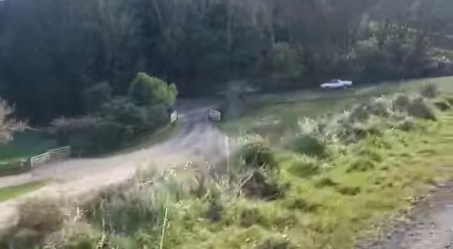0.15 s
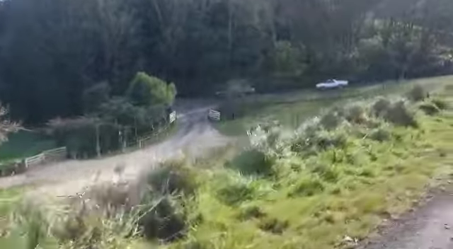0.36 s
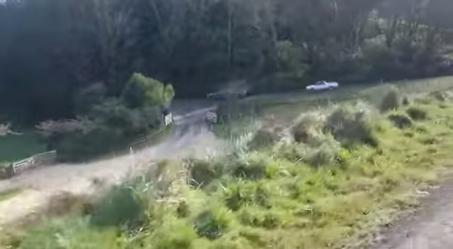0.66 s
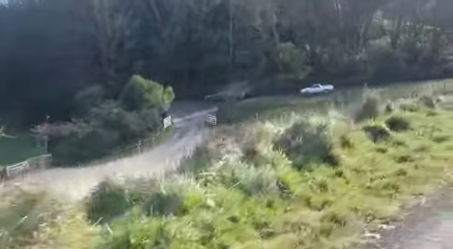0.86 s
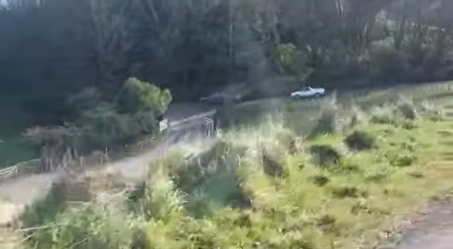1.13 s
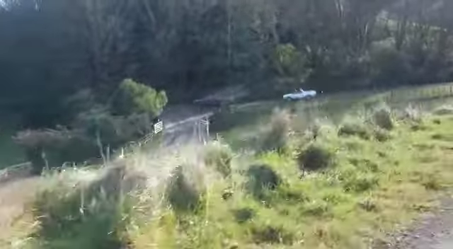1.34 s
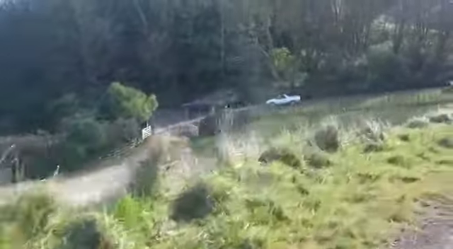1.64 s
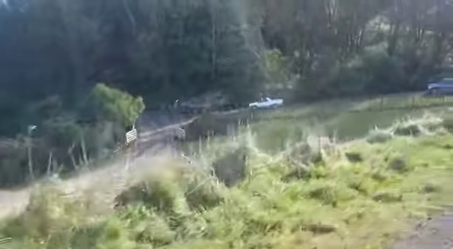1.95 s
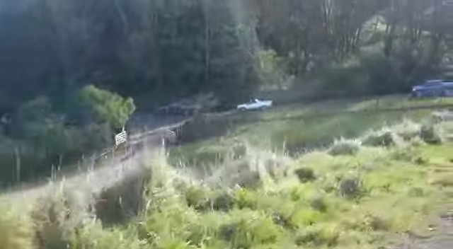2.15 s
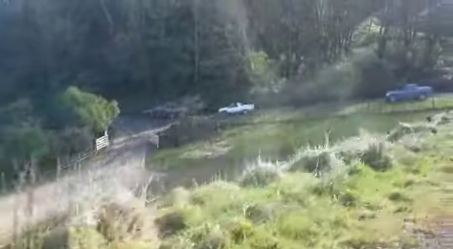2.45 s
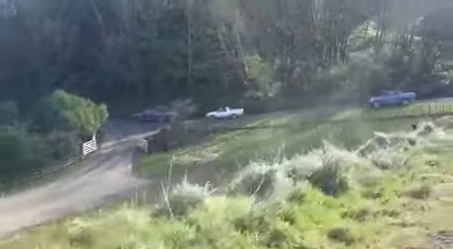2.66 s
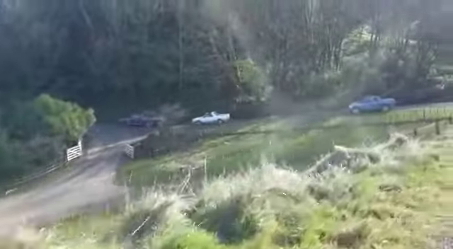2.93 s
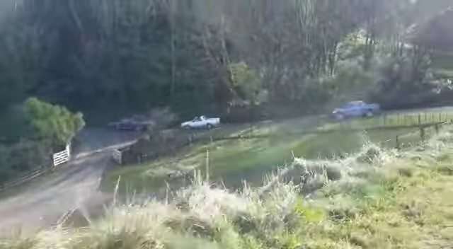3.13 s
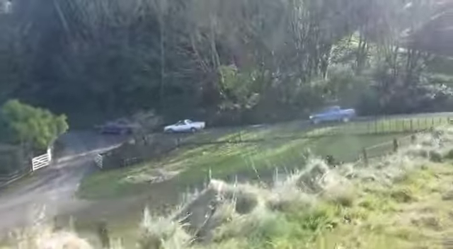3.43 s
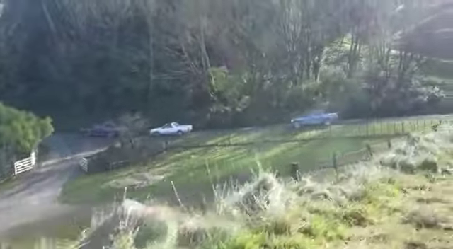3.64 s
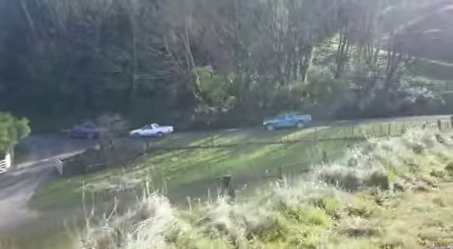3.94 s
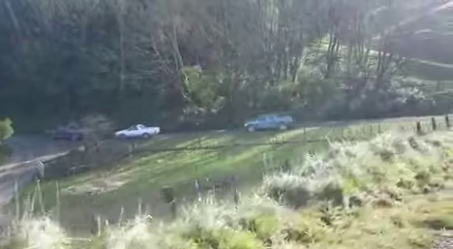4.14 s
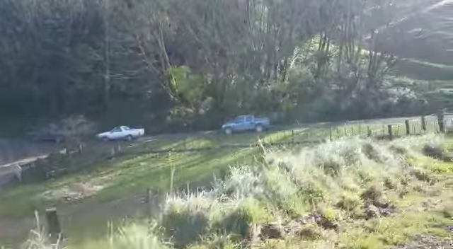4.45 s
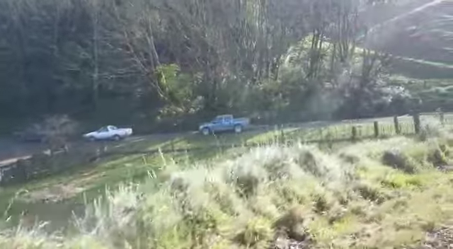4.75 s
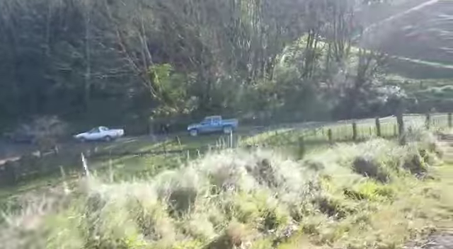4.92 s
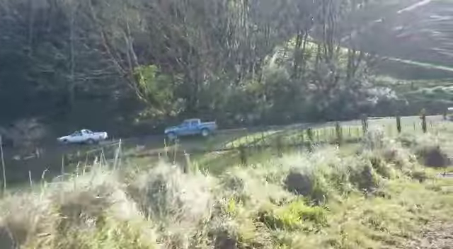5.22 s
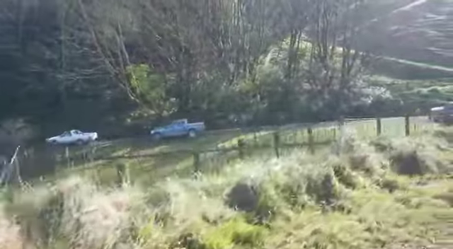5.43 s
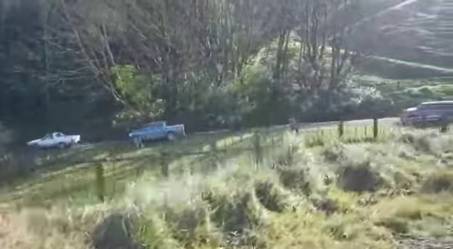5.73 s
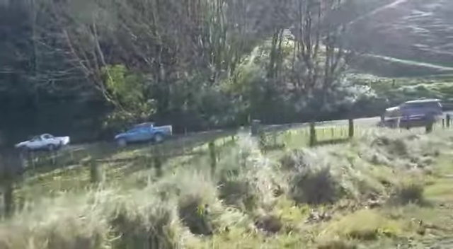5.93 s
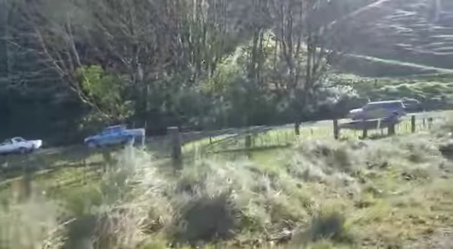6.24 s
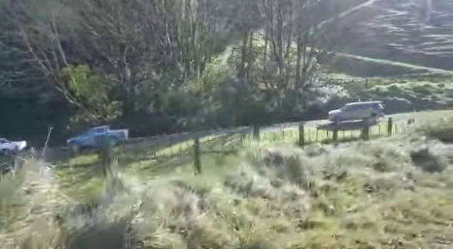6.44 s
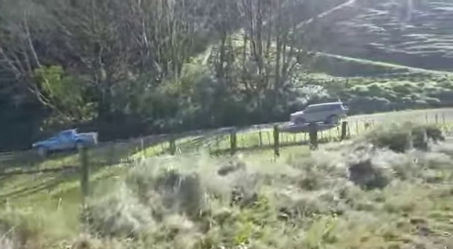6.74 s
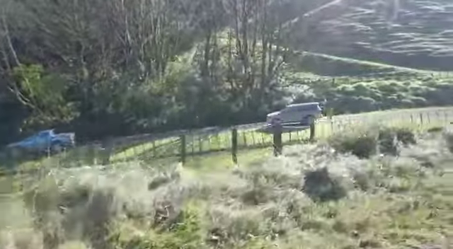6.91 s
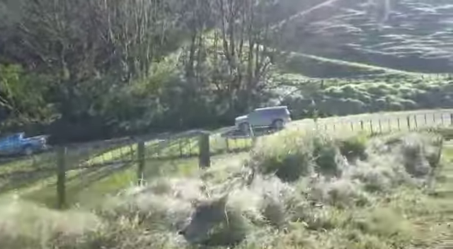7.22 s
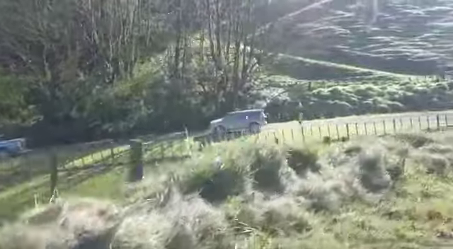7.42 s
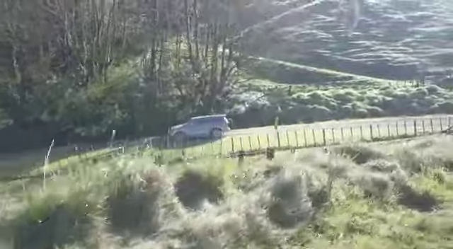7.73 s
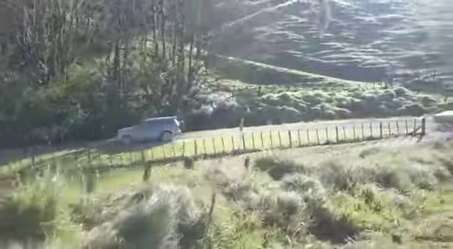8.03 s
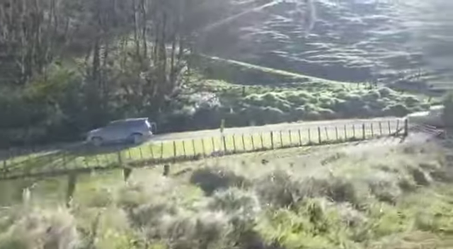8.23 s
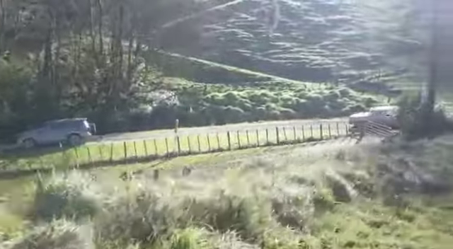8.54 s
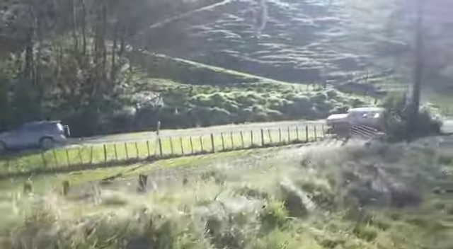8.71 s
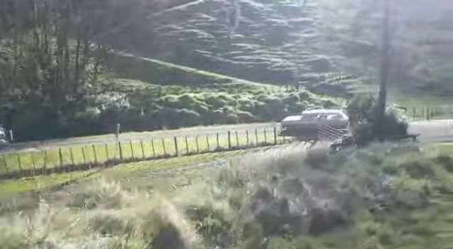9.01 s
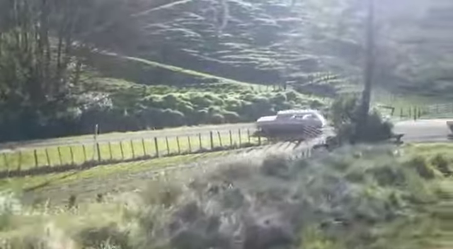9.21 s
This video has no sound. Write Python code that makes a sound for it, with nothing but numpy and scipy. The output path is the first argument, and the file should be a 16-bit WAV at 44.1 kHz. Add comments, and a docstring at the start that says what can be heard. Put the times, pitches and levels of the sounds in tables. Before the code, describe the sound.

A close on-board microphone catches a loud, low, pulsing exhaust, its beats galloping, limping and stumbling, with hissing gas and chattering thin metal on every firing. Chassis rumble and gravelly tyre noise run throughout. Small ticks knock mostly in the first half, then a fluctuating intake rasp and drone enter and the turning quickens. No echoes; the engine keeps running to the end.

```python
"""A farm track, heard while riding on a vehicle whose small engine misfires into a broken exhaust.
It limps in rounds of eight turns: firings boom in the silencer and shake its loose metal, unfired turns only puff.
A little before halfway the intake begins to rasp; past halfway the engine turns faster.
Noise shaped into rumble, roar and crunch makes the ride; short bursts make the knocks, and thin hisses flare up."""
import sys
import numpy as np
from scipy import signal
from scipy.fft import rfft, irfft, next_fast_len
from scipy.io import wavfile
from scipy.ndimage import map_coordinates

SR = 44100
rng = np.random.default_rng(int(sys.argv[2]) if len(sys.argv) > 2 else 0)


def persist_wave(psi):
    """Save psi, clipped to +-1, as 16-bit WAV."""
    counts = np.round(np.clip(psi, -1, 1) * 32767).astype(np.int16)
    wavfile.write(sys.argv[1], SR, np.atleast_2d(counts).T)


N = 413216
TOP_HZ = 15720  # nothing sounds above this pitch

# the tinny colour of thin loose metal, as a spectrum: pitch_hz [Hz], level_db [dB, relative]
TIN_COLOUR = [(300, -38), (900, 2), (1900, -0.5), (3000, 1), (3700, 0), (5200, -0.5), (7400, -6),
              (8600, -25.5), (12000, -38), (15500, -30.5)]


def amp(db):
    """Turn decibels into a gain."""
    return 10 ** (np.asarray(db) / 20)


def unit(x):
    """Scale to an average (rms) level of 1."""
    return x / np.sqrt(np.mean(x ** 2) + 1e-20)


def curves(rows):
    """Draw straight lines between timed rows: one value per sample for each column after the time."""
    start_s, *columns = np.transpose(rows)
    time_s = np.arange(N) / SR
    return [np.interp(time_s, start_s, column) for column in columns]


def wobble(rate):
    """A smooth random curve through `rate` random points a second."""
    points = rng.standard_normal(int(N * rate / SR) + 4)
    return map_coordinates(points, [np.arange(N) * rate / SR])


def filtered(x, response):
    """Change the strength and phase of each pitch in x by a response given as a function of Hz."""
    size = next_fast_len(N + SR // 2)
    pitch_hz = np.fft.rfftfreq(size, 1 / SR)
    return irfft(rfft(x, size) * response(pitch_hz), size)[:N]


def coloured(x, points):
    """Shape x by a spectrum of (Hz, dB) points, keeping the power of white noise."""
    point_hz, point_db = np.transpose(points)

    def response(hz):
        return unit(amp(np.interp(np.log(hz + 1), np.log(point_hz), point_db)))

    return filtered(x, response)


def resonate(x, modes):
    """Ring x through resonances of (Hz, width in Hz, dB), added with alternating sign."""
    def response(f):
        total = 0
        for k, (centre, width, db) in enumerate(modes):
            peak = 1j * f * width / (centre * centre - f * f + 1j * f * width)
            total = total + (-1) ** k * amp(db) * peak
        return total

    return filtered(x, response)


def muffled(x, hz):
    """Remove the treble above hz with a steep low-pass."""
    return signal.sosfilt(signal.butter(4, hz, fs=SR, output="sos"), x)


def impulses(times, sizes):
    """Place one single-sample spike at each time."""
    places = np.maximum(np.round(times * SR), 0).astype(int)
    return np.bincount(places, sizes, N)[:N]


def add(layer, s, sound):
    """Mix a sound into the layer at time s."""
    room = layer[max(round(s * SR), 0):][:len(sound)]
    room += sound[:len(room)]


def crank(kick_s=0.0004, jitter_s=0.0004):
    """Time the turns of the crank: firings as rows (s, boom dB, rattle dB), and the times of unfired turns."""
    # progress, about 38 turns a second at first and 44 later: time_s [s], turns completed [count]
    crank_progress = [(0.003, 0), (0.955, 36), (2.622, 100), (2.862, 109), (3.272, 125), (4.322, 165),
                      (4.524, 173), (5.554, 213), (5.745, 221), (5.922, 229), (7.177, 285), (8.259, 333),
                      (9.373, 382)]
    # gait name: the turns of an eight-turn round that fire [numbered from 0]
    firing_gaits = {"trot": (0, 2, 5), "gallop": (0, 2, 3, 5), "limp": (2, 3, 5), "stumble": (2, 4, 5),
                    "roll": (2, 3, 4, 5)}
    # spells of running: start_s [s], gaits repeated in this order, one a round [names]
    running_spells = [(0.06, "gallop gallop roll limp"), (0.9, "roll limp gallop"), (2.81, "roll"),
                      (3.22, "stumble stumble gallop"), (3.85, "trot"), (4.47, "stumble roll roll stumble"),
                      (5.7, "trot"), (8.53, "trot trot gallop gallop gallop")]
    # strength of a firing on each turn of the round: boom_db [dB, relative], rattle_db [dB, relative]
    round_levels = [(-16, -57.5), (-17, -60), (-16.5, -56.5), (-16, -56), (-16, -56.5), (-16, -57),
                    (-18, -60.5), (-16.5, -58.5)]
    # how hard the engine sounds along the ride: time_s [s], boom_db [dB, added], rattle_db [dB, added]
    vigour_levels = [(0, -0.5, -1), (1, 0.5, 0), (2.5, 0.5, 0), (3.4, -1, 0.5), (4.3, 1, -2),
                     (5.1, -.5, -2.5), (5.8, -.5, 0), (6.6, 0.5, 1), (7.4, 1, 0.5), (8.1, 0, 1),
                     (8.9, -1, 0.5), (9.37, -0.5, -1.5)]
    # strays outside the gait and weak or hard burns: time_s [s], boom_db [dB, added], rattle_db [dB, added]
    odd_firings = [(0.0, -7.5, -7.5), (0.27, 0, 5.5), (0.8, -8, -4.5), (1.08, -4.5, -13), (2.33, 0.5, -2.5),
                   (2.41, -5.5, -7.5), (2.54, 1.5, 1.5), (3.02, 1, -9), (3.38, 1, -1), (3.4, 0.5, 1),
                   (3.43, -4, -4.5), (3.48, 2.5, -10.5), (3.53, -1, -8.5), (3.56, 0.5, -8.5), (3.9, 1, -7),
                   (4.03, 0.5, 5.5), (4.24, -5, -2), (4.27, 0.5, 4), (4.37, -0.5, -3.5), (4.45, 0, 2.5),
                   (4.6, -3, -5), (5.3, 0, -4.5), (5.81, -7, -11), (5.99, -5.5, -5), (6.21, -1, -1.5),
                   (6.24, -0.5, 1.5), (6.35, -19, -11.5), (6.42, 2, 2.5), (6.53, -3, -2),
                   (7.56, -3.5, -14.5), (7.78, -3.5, -4), (7.85, 0.5, 2.5), (7.96, -3.5, -5.5),
                   (8.35, -1, 3.5), (8.44, -15, -14.5), (8.69, -3, 6.5), (8.83, -16, -13), (8.9, 1.5, 8),
                   (9.19, -21, -17)]

    time_s, count = np.transpose(crank_progress)
    turns = np.interp(np.arange(count[-1]), count, time_s)

    def nearest(time):
        return np.argmin(np.abs(turns - time))

    fires = np.zeros(len(turns), bool)
    place = np.zeros(len(turns), int)  # position of each turn within its round
    extra_db = np.zeros((2, len(turns)))
    for start_s, names in running_spells:
        first = nearest(start_s)
        left = len(turns) - first
        spell = [k in firing_gaits[name] for name in names.split() for k in range(len(round_levels))]
        fires[first:] = np.resize(spell, left)  # repeats until a later spell replaces it
        place[first:] = np.arange(left) % len(round_levels)
    for time, *db in odd_firings:
        fires[nearest(time)] = True
        extra_db[:, nearest(time)] = db

    # three firings in a row kick the flywheel a little ahead; every turn is also slightly uneven
    third_in_row = fires & np.roll(fires, 1) & np.roll(fires, 2)
    times = turns - kick_s * third_in_row + jitter_s * rng.standard_normal(len(turns))
    knots, *vigour = np.transpose(vigour_levels)
    vigour_db = [np.interp(turns, knots, db) for db in vigour]
    boom_db, rattle_db = np.array(round_levels)[place].T + extra_db + vigour_db
    return np.column_stack([times, boom_db, rattle_db])[fires], turns[~fires]


def exhaust(fired, missed, boom_db=53.0, puff_db=-32, scatter_db=0.74, pipe_top_hz=1200):
    """Each pressure pulse rings the silencer and, weakly, the pipe; churning gas adds a steady murmur."""
    # ringing of the pipe: centre_hz [Hz], width_hz [Hz], level_db [dB, relative]
    pipe_modes = [(227, 8.4, -25.5), (321, 30, -34.5), (352.1, 13, -25), (548, 24, -41)]
    # the whole silencer box: centre_hz [Hz], width_hz [Hz], level_db [dB, relative]
    box_modes = [(53.6, 8.3, 0), (68.6, 16.3, -.5)]
    # its chambers, before heat shifts them: centre_hz [Hz], width_hz [Hz], level_db [dB, relative]
    chamber_modes = [(176.9, 24.9, -2.2), (196, 17.4, -4.9)]
    # the frame rocking on its mounts: centre_hz [Hz], width_hz [Hz], level_db [dB, relative]
    frame_modes = [(36, 10, -15.5)]
    # changing level of the box's deep ring: time_s [s], level_db [dB, relative]
    deep_levels = [(0, 0.5), (5.2, 0.96), (5.8, 0.5), (8, -1), (9.37, 2)]
    flow_db, cooling_s = -39, .04
    cool_pitch, hot_pitch = .985, 1.04  # factors on both chambers' pitch

    times = fired[:, 0]
    # no two burns are alike: each shares its push differently between box and chambers
    scatter = scatter_db * rng.standard_normal((len(fired), 2)).T
    deep, upper = amp(fired[:, 1] + scatter)
    puffs = impulses(missed, amp(puff_db + 2 * rng.standard_normal(len(missed))))

    # firings in quick succession heat the gas, which raises the note of the chambers
    age = times[:, None] - times
    earlier_heat = (age > 0) * np.exp(-np.abs(age) / cooling_s)
    heat = np.minimum(np.sum(earlier_heat, axis=1), 1)
    cool_pulses = puffs + impulses(times, upper * (1 - heat))
    hot_pulses = impulses(times, upper * heat)
    cool = resonate(cool_pulses, np.multiply(chamber_modes, [cool_pitch, 1, 1]))
    hot = resonate(hot_pulses, np.multiply(chamber_modes, [hot_pitch, 1, 1]))

    gas = puffs + impulses(times, deep)
    depth_db, = curves(deep_levels)
    box = amp(depth_db) * resonate(gas, box_modes)
    bangs = box + cool + hot + resonate(gas, pipe_modes) - resonate(gas, frame_modes)
    churn = amp(flow_db) * unit(resonate(rng.standard_normal(N), box_modes + chamber_modes))
    return muffled(amp(boom_db) * bangs + churn, pipe_top_hz)


def rattle(fired, hiss_db=-3, ring_db=1, hold_s=0.034, rise_s=0.0014, grit_db=3,
           spray_db=-77, spray_power=0.91):
    """Every firing spits gas through the split, heard as hiss, and sets the loose shield chattering."""
    # the finest spray of each spit, as a spectrum: pitch_hz [Hz], level_db [dB, relative]
    spray_colour = [(5000, -28), (8000, -2), (10000, 2), (11500, -16.5), (12800, -4.5), (13600, 6.5),
                    (14500, -1.5), (15500, -0.5)]
    t = np.arange(SR // 14) / SR
    shape = (1 - np.exp(-t / rise_s)) * np.exp(-(t / hold_s) ** 2)
    jet, metal = np.zeros(N), np.zeros(N)
    for s, _, db in fired:
        spit = amp(db + 1.0 * rng.standard_normal()) * shape
        add(jet, s, spit)
        add(metal, s, chatter(spit))
    gas = unit(rng.standard_normal(N) * amp(grit_db * wobble(900)))
    hiss = amp(hiss_db) * coloured(jet * gas, TIN_COLOUR)
    ring = amp(ring_db) * muffled(metal, hz=7550)
    # a power below 1 makes the spray slightly more even than the spits
    spray = amp(spray_db) * coloured(unit(jet ** spray_power) * gas, spray_colour)
    return hiss + ring + spray


def chatter(spit, favour_db=7, ring_t60=.02):
    """A loose shield buzzes under one spit; the contact point wanders, so each time other modes are favoured."""
    # ringing of the shield, before random shifts: pitch_hz [Hz], level_db [dB, relative]
    shield_modes = [(1950, -1), (2350, 0.5), (3000, -1), (4300, -9), (5050, -2.5), (5700, -6.5),
                    (7350, -10)]
    t = np.arange(round(ring_t60 * SR)) / SR  # ring_t60: seconds to fade by 60 dB
    hz, mode_db = np.transpose(shield_modes)
    pitch = hz * (1 + 0.058 * rng.standard_normal(len(hz)))
    strength = amp(mode_db + favour_db * rng.standard_normal(len(hz)))
    ring = strength @ np.sin(2 * np.pi * np.outer(pitch, t))
    contacts = spit * rng.standard_normal(len(spit)) ** 3  # cubing makes a few hits stand out
    buzz = signal.fftconvolve(contacts, ring * amp(-60 * t / ring_t60))[:len(spit)]
    return unit(buzz) * np.sqrt(np.mean(spit ** 2))


def intake(turns, firings, rasp_db=-46, drone_db=-43, rasp_grows=1.26, drone_grows=0.85, flutter_db=1,
           swell_db=2, suck_s=0.027, snap=0.44, hum=1.07, waver_hz=7, top_hz=2100):
    """Rushing air and a pulse each turn ring the intake tract and airbox; the airbox swells after firings."""
    # throttle, as the level of the intake rasp: time_s [s], level_db [dB, relative]
    throttle_levels = [(3.9, -76), (4.08, -54), (5.06, -58), (5.56, -51.5), (6.08, -49), (6.28, -69.5),
                       (6.37, -48), (6.49, -46.5), (6.56, -73), (6.66, -46.5), (6.87, -52), (7.16, -47.5),
                       (7.21, -59), (7.27, -48), (8.24, -52), (8.32, -45.5), (8.47, -64.5), (8.5, -51.5),
                       (8.96, -48.5), (9.09, -68.5), (9.12, -53), (9.23, -71), (9.29, -50.5), (9.37, -48)]
    # intake tract: centre_hz [Hz], width_hz [Hz], level_db [dB, relative]
    intake_modes = [(579, 49, 2.5), (874.5, 22, 3), (1012, 51, -1.5), (1209, 45, 3.5), (1362, 57, 5),
                    (1414, 62, 4.5), (1474, 81, -4.5), (1682, 90, -7)]
    # airbox: centre_hz [Hz], width_hz [Hz], level_db [dB, relative]
    airbox_modes = [(253, 33.4, -4), (353, 14, 2), (539, 11, -5.5)]

    throttle, = curves(throttle_levels)
    throttle = throttle - np.percentile(throttle, 90)  # 0 dB is a widely open throttle
    rasp = rasp_grows * throttle + flutter_db * wobble(14)
    drone = drone_grows * throttle + swell_db * wobble(13)
    # fade-ins of the rasp and of the drone: (s, gain)
    opening, = curves([(3.98, 0), (4.06, 1)])
    pulling, = curves([(3.9, 0), (4.1, .4), (5.35, .4), (5.55, 1)])

    age = np.arange(SR // 5) / SR / suck_s
    firing_spikes = impulses(firings, np.ones(len(firings)))
    suction = unit(signal.fftconvolve(firing_spikes, age * np.exp(-age))[:N])
    turn_spikes = unit(impulses(turns, np.ones(len(turns))))
    gulps = muffled(rng.standard_normal(N) + snap * turn_spikes, top_hz)
    tract = opening * amp(rasp + rasp_db) * unit(resonate(gulps, intake_modes))

    # the air in the box's neck swings as an almost pure tone
    neck_hz = airbox_modes[0][0] + waver_hz * wobble(15)
    neck = np.sin(2 * np.pi * np.cumsum(neck_hz) / SR)
    airbox = unit(unit(resonate(gulps, airbox_modes)) + hum * neck)
    return tract + pulling * suction * amp(drone + drone_db) * airbox


def track(tyre_db=-43, gravel_db=-65, rumble_db=-35, bumps_db=2, grit_db=2.05, crunch_db=1.0):
    """Tyres roar and crunch over dirt, and the chassis rumbles: three uneven noises, each with its colour."""
    # roughness of the track, used relative to its mean: time_s [s], roar_db [dB], hiss_db [dB]
    roughness = [(0.0, -47.5, -61.5), (0.73, -45, -63), (4.36, -47, -63), (5.04, -48.5, -65),
                 (5.9, -47, -64), (6.16, -47.5, -64.5), (7.7, -46, -60.5), (8.64, -46, -62.5),
                 (8.74, -46.5, -59.5), (9.37, -47, -63)]
    # spectra of tyres, gravel under them, and chassis: pitch_hz [Hz], level_db [dB, relative]
    tyre_colour = [(150, 0), (330, 3.5), (430, -3.5), (560, -1), (880, -5), (980, -9), (1200, -8),
                   (1500, -20.5), (2200, -35.5), (3700, -46.5), (9000, -69)]
    gravel_colour = [(1000, -7), (2000, 5), (3000, 3), (3700, -1.5), (5500, -0.5), (7500, -6),
                     (8800, -16.5), (11500, -30), (15000, -29)]
    chassis_colour = [(18, -45), (26, -22), (33, -5), (43, 10.5), (70, 27), (100, 3.5), (190, 2),
                      (230, -21.5), (400, -46.5)]

    roar, hiss = [db - db.mean() for db in curves(roughness)]
    ruts = 1.4 * wobble(12)  # dB, shared by tyres and gravel
    gritty = amp(grit_db * wobble(150)) * rng.standard_normal(N)
    tyres = amp(roar + tyre_db + ruts) * coloured(gritty, tyre_colour)
    crunch = unit(amp(crunch_db * wobble(400)) * rng.standard_normal(N))
    gravel = amp(hiss + gravel_db + ruts) * coloured(crunch, gravel_colour)
    bumps = amp(rumble_db + bumps_db * wobble(6.3))
    rumble = bumps * coloured(rng.standard_normal(N), chassis_colour)
    return tyres + gravel + rumble


def fittings(tick_db=-6, t60=0.037, crack_db=9, crack_t60=0.0045):
    """Loose parts knock: a bright crack and a dry tick, each a fast-fading burst of noise."""
    # knocks of loose fittings: start_s [s], tick level_db [dB, relative], crack level_db [dB, relative]
    knock_times = [(0.157, -37.5, -69), (0.208, -38, -65), (0.415, -44, -68), (0.6519, -41.5, -72),
                   (0.7641, -34.5, -53), (1.4301, -44.5, -75), (2.1817, -42, -68), (2.648, -47, -64),
                   (3.1721, -39, -73), (3.6084, -38, -76.5), (4.0128, -41.5, -74), (4.148, -40, -85),
                   (4.4276, -38, -66.5), (4.6384, -43.5, -64.5), (4.6726, -39.5, -73), (8.7011, -37, -64),
                   (9.0193, -37, -63)]
    t = np.arange(SR // 20) / SR  # the t60 settings are seconds to fade by 60 dB
    knocks, cracks = np.zeros(N), np.zeros(N)
    for s, db, bright_db in knock_times:
        add(knocks, s, amp(db + tick_db - 60 * t / t60) * rng.standard_normal(len(t)))
        add(cracks, s, amp(bright_db + crack_db - 60 * t / crack_t60) * rng.standard_normal(len(t)))
    return coloured(knocks, TIN_COLOUR) + cracks


def flares(edge_hz=13300, flicker_db=3):
    """A thin flickering hiss flares up now and then at the very top: noise kept to a narrow high band."""
    # flares of hiss: start_s [s], length_s [s], level_db [dB, at the peak of the swell]
    flare_times = [(0.983, .2, -77), (5.255, .25, -75.5), (5.548, 0.22, -73.5), (6.603, .18, -72),
                   (7.75, .16, -75), (8.183, .16, -76.5)]
    swell = np.zeros(N)
    for s, length_s, db in flare_times:
        add(swell, s, amp(db) * np.hanning(round(length_s * SR)))
    hiss = filtered(rng.standard_normal(N), lambda hz: (hz > edge_hz) & (hz < TOP_HZ))
    return swell * unit(amp(flicker_db * wobble(60)) * hiss)


def scene():
    """Add up all sources, heard from on board with no echoes."""
    fired, missed = crank()
    firings = fired[:, 0]
    turns = np.sort(np.r_[firings, missed])
    engine = exhaust(fired, missed) + rattle(fired) + intake(turns, firings)
    ride = track() + fittings() + flares()
    return (engine + ride)[None]


def record(dry):
    """Cut away everything from TOP_HZ upwards."""
    return filtered(dry[0], lambda hz: hz < TOP_HZ)[None]


dry = scene()
out = record(dry)
persist_wave(out)
```